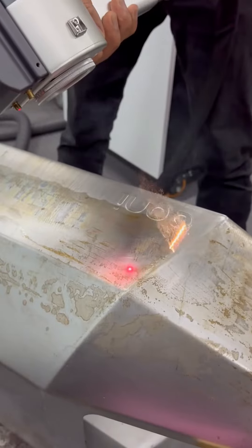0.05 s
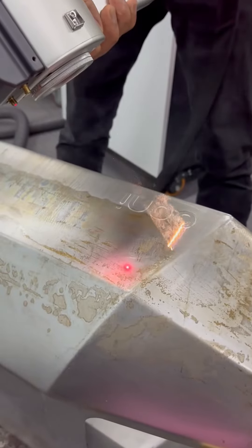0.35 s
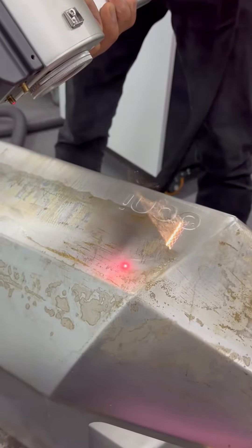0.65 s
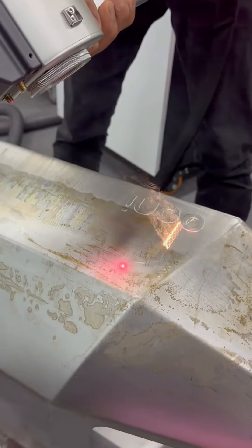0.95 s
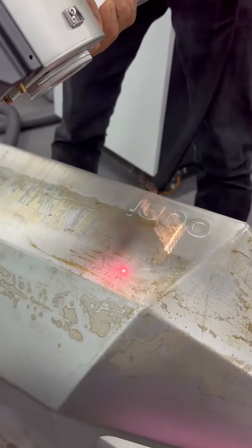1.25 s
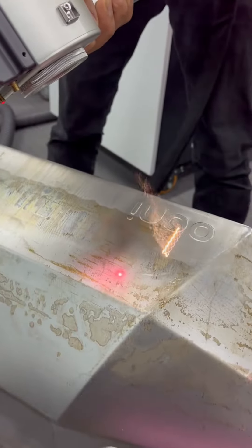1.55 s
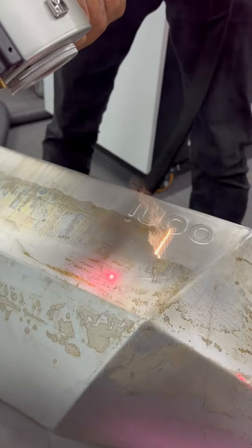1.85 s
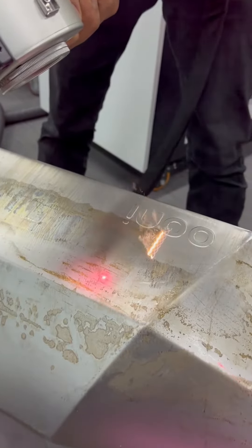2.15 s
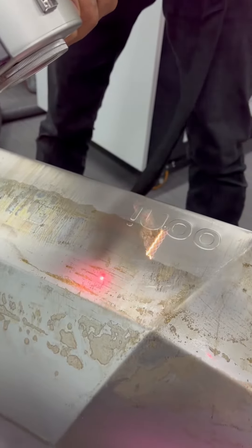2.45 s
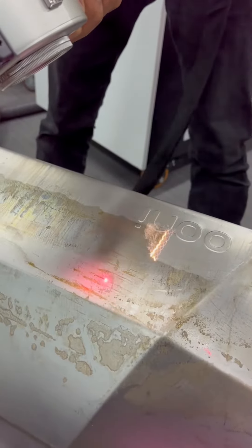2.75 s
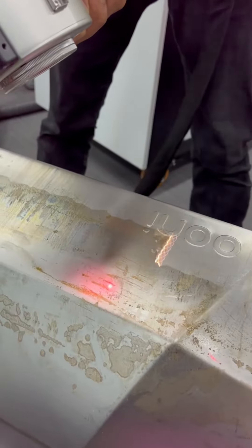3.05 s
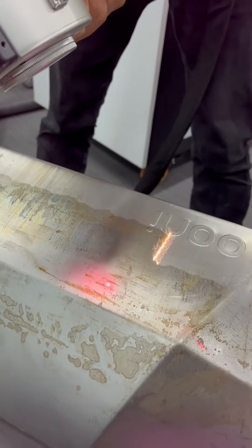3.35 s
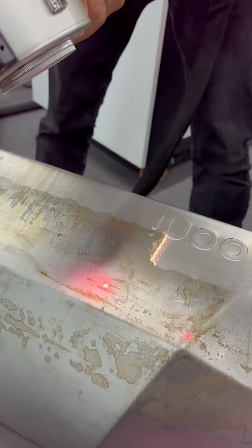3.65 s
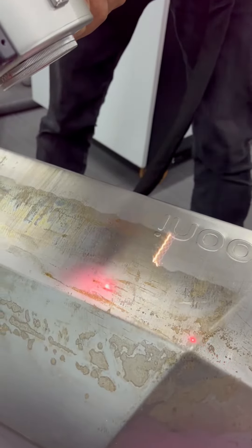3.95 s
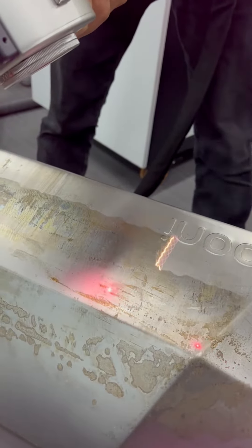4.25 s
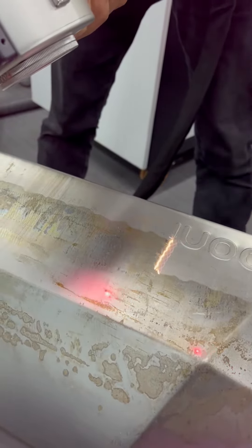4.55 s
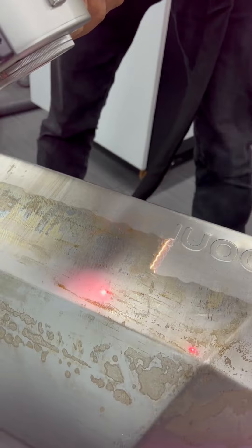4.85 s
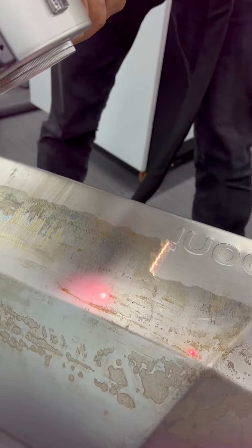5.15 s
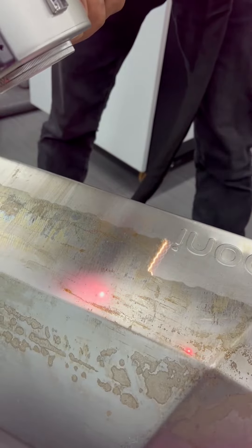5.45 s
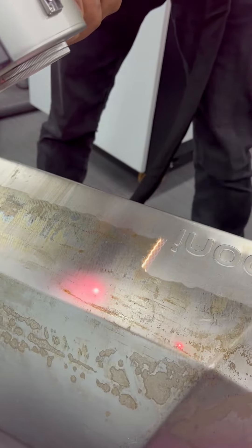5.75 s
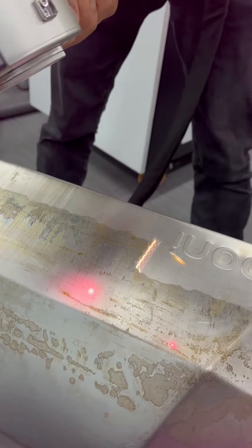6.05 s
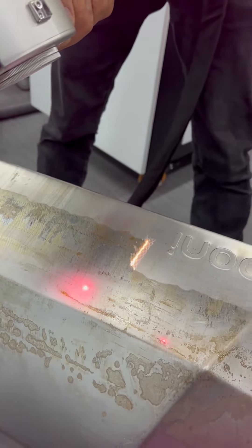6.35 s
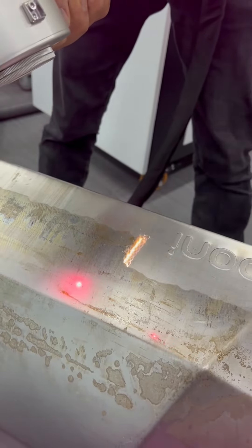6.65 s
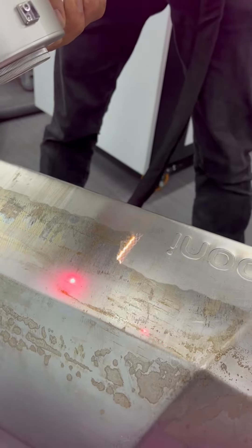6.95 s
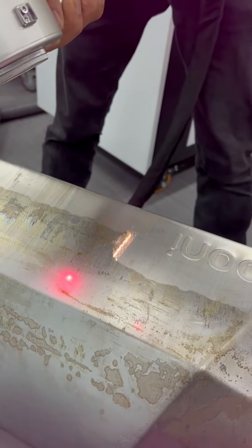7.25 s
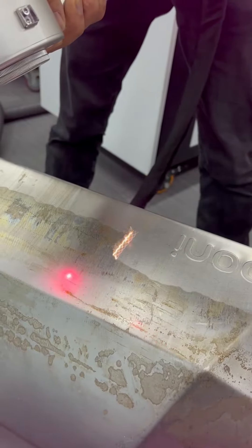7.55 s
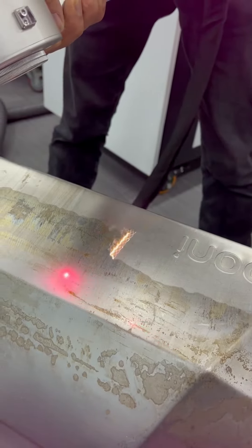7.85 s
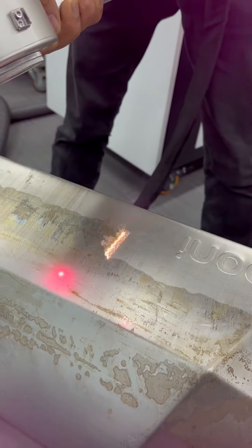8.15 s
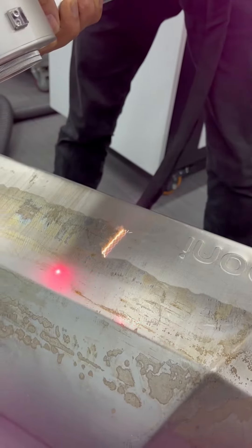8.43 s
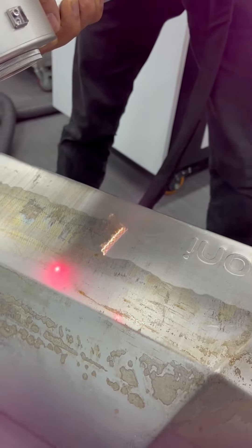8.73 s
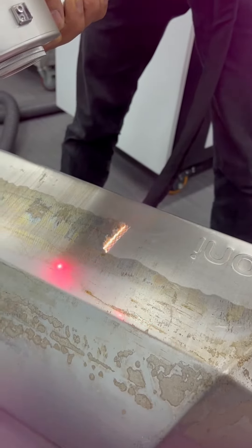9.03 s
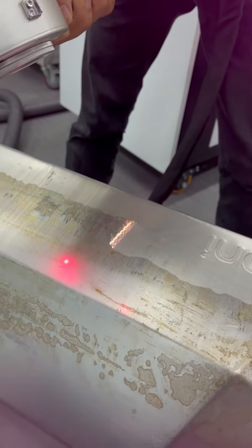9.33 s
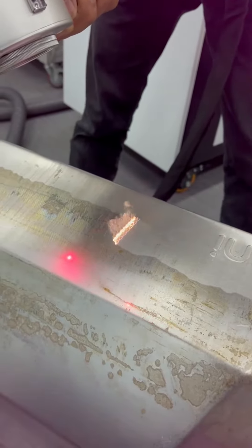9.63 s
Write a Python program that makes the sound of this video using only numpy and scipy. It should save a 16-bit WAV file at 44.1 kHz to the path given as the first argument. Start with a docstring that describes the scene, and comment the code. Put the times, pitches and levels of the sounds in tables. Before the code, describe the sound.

A close, sizzling electric buzz with sharp pops from a laser cleaning oily metal, over a steady workshop machine hum.

```python
"""A handheld laser cleaner burns oil film off a metal block, close to a phone in a workshop.
The beam retraces one figure 49 times a second and spits at the same oily spots on every round:
a crackling buzz that surges with the oil it meets and twice catches flame. Thick specks pop, smoke
roars softly and the mirror that steers the beam whines. Fans, a pump and a chiller hum behind it."""
import sys
import numpy as np
from scipy import signal
from scipy.fft import rfft, irfft, next_fast_len
from scipy.io import wavfile
from scipy.ndimage import map_coordinates

SR = 44100
rng = np.random.default_rng(int(sys.argv[2]) if len(sys.argv) > 2 else 0)


def waveform_to_disk(signal):
    """Save audio, clipped to [-1, 1], as 16-bit WAV at the path in sys.argv[1]."""
    frames = np.transpose(np.atleast_2d(signal))
    scaled = np.clip(frames, -1, 1) * 32767
    samples = np.round(scaled).astype(np.int16)
    wavfile.write(sys.argv[1], SR, samples)


N = 431738
T = np.arange(N) / SR
SCAN_HZ = 48.906  # rounds of the beam per second
USUAL_BURN_DB = -30  # burn level of an average film
# thick specks that burst in a single pass: (time [s], level [dB])
SPECKS = [(.1741, -16.5), (0.448, -17.5), (0.4686, -20), (.558, -17), (0.57, -20), (.5808, -17),
          (.7217, -15), (.7346, -22), (.7439, -18), (0.985, -15), (1.0079, -17), (1.028, -22),
          (1.1113, -17), (1.1208, -18), (1.1316, -17), (1.1522, -23), (1.275, -20), (1.3958, -17),
          (1.4785, -15.5), (1.4982, -13), (1.6021, -16), (1.6233, -15.5), (1.644, -18), (1.6633, -17),
          (1.6825, -14), (1.7648, -18), (1.867, -15.5), (1.9293, -18), (2.356, -21), (3.3595, -16),
          (6.3657, -14.5), (6.4062, -16.5), (6.4263, -18), (6.4465, -21), (6.4671, -15), (6.4875, -16),
          (6.5082, -14), (6.5286, -14.5), (6.5488, -18), (6.5577, -16), (6.5694, -17), (6.5897, -13),
          (6.611, -21), (6.7207, -16), (7.1217, -14), (7.142, -13.5), (7.203, -17.5), (7.224, -20),
          (7.4093, -14), (7.4306, -14.5), (7.5487, -16), (7.5692, -19), (7.9319, -18.5), (7.9523, -19),
          (7.972, -15.5), (8.0021, -19), (8.0746, -19), (8.0956, -18), (8.1154, -18), (8.1771, -20),
          (8.2474, -17), (8.5728, -14.5), (8.684, -15), (8.7047, -17), (8.8684, -18), (9.1466, -14.5),
          (9.6163, -20), (9.6339, -12), (9.641, -18), (9.6616, -22)]


def undb(db):
    """Turn decibels into a gain."""
    return 10 ** (np.asarray(db) / 20)


def curve(table, at):
    """Join (x, value) rows with straight lines."""
    return np.interp(at, *np.transpose(table))


def walk(rate, at=T):
    """A random drift of size about 1 that takes `rate` turns a second."""
    knots = rng.standard_normal(1024)
    return np.interp(at * rate, np.arange(len(knots)), knots)


def spectrum(points, hz):
    """Gain at each frequency, from (Hz, dB) points joined on a log axis."""
    f, db = np.transpose(points)
    return undb(np.interp(np.log(hz + 1), np.log(f), db))


def convolve(x, response):
    """Pass sound through a short response, such as an echo."""
    return signal.oaconvolve(x, response)[:N]


def colour(x, points, size=4096):
    """Shape the tone with a filter that never rings ahead of a pop, so pops stay sharp."""
    cepstrum = irfft(np.log(spectrum(points, np.fft.rfftfreq(size, 1 / SR))))
    cepstrum[1:size // 2] *= 2
    cepstrum[size // 2 + 1:] = 0
    return convolve(x, irfft(np.exp(rfft(cepstrum))))


def cut(x, hz, kind, order=2):
    """Keep what lies below ("low") or above ("high") a frequency."""
    return signal.sosfilt(signal.butter(order, hz, kind, fs=SR, output="sos"), x)


def flash_train(times, sizes, width_s, front_share=.22):
    """Loudness outline of short flashes, each with a quick rise and a slower fall."""
    index = (times[:, None] * SR).astype(int) + np.arange(-180, 260)
    since = index / SR - times[:, None] + width_s / 2
    slope = 2 * width_s * np.where(since < 0, front_share, 1 - front_share)
    bells = sizes[:, None] * np.exp(-(since / (2 * slope)) ** 2)
    inside = (index >= 0) & (index < N)
    return np.bincount(index[inside], bells[inside], N)


def snap_train(times, sizes):
    """Sharp clicks at exact times, even between samples."""
    index = (times[:, None] * SR).astype(int) + np.arange(-7, 9)
    since = index - times[:, None] * SR
    clicks = sizes[:, None] * np.sinc(since) * np.sinc(since / 8)
    inside = (index >= 0) & (index < N)
    return np.bincount(index[inside], clicks[inside], N)


def workshop(x, room_db=-11, fade_s=0.079):
    """The room's short echo, which falls 60 dB in fade_s."""
    t = T[:SR // 2]
    tail = rng.standard_normal(len(t)) * undb(-60 * t / fade_s) * (t > .002)
    return convolve(x, undb(room_db) * tail / np.linalg.norm(tail))


def microphones(direct, diffuse, apart_hz=900):
    """The phone's two microphones differ in timing and level; room sound is alike only in the bass."""
    # how far the left one is ahead: (frequency [Hz], phase [rad])
    lead = [(100, 0), (300, -.25), (500, -.9), (800, -.9), (1150, -.6), (1350, -.35), (1800, 0), (2300, .9),
            (2650, 2.1), (3200, 2.1), (3700, 1.4), (4200, 1.1), (4500, 1.7), (4900, .7), (5800, 3.14),
            (16000, 17.5)]
    # how much louder the left one is: (frequency [Hz], gain [dB])
    balance = [(400, 0), (740, .5), (860, -2), (1030, -.3), (1200, -2), (1550, 0), (1850, 0), (2450, -5.5),
               (2900, -7.5), (3400, -3), (4400, -4.5), (5400, 0)]
    padded = next_fast_len(N)
    hz = np.fft.rfftfreq(padded, 1 / SR)
    sides = np.array([[1], [-1]])
    common, apart = rfft(diffuse, padded)
    unlike = .5 / (1 + (apart_hz / (hz + 1)) ** 2)
    room = np.sqrt(1 - unlike) * common + sides * np.sqrt(unlike) * apart
    facing = np.sqrt(spectrum(balance, hz)) ** sides * np.exp(.5j * sides * curve(lead, hz))
    return irfft((rfft(direct, padded) + room) * facing, padded)[:, :N]


def fans(flutter_db=1.5):
    """Swirling air rushes from the cooling fans."""
    # tone of the rush: (frequency [Hz], level [dB])
    tone = [(20, -100), (32, -72), (46, -59.5), (70, -62), (125, -57.5), (190, -56.5), (245, -53.5),
            (330, -60), (480, -60), (900, -66), (2000, -80.5), (4500, -86), (7000, -104), (16000, -85)]
    return colour(rng.standard_normal(N) * np.sqrt(SR / 2), tone) * undb(flutter_db * walk(9))


def hum(harmonics, hz, wander=0.0036, waver_db=1.4, in_step_s=5.5):
    """One machine's tones, on multiples of hz; they waver a little with its load."""
    tones = sum(undb(db) * np.cos(2 * np.pi * k * hz * (T - in_step_s) + wander * k * hz * walk(3))
                for k, db in harmonics)
    return np.sqrt(2) * tones * undb(waver_db * walk(9.6))


def machines():
    """Chiller, mains power, fan blades and pump hum; pump and mains throb together 3 times a second."""
    # tones of each hum: (multiple, level [dB])
    chiller_tones = [(1, -32), (2, -46), (3, -53)]
    mains_tones = [(2, -37.5), (4, -46), (6, -49), (8, -47)]
    blade_tones = [(2, -44), (3, -51)]
    pump_tones = [(2, -34.5), (3, -42), (4, -47), (5, -47), (6, -47), (7, -51), (9, -51), (11, -51),
                  (14, -53), (17, -55), (18, -53), (19, -58)]
    # how two of the hums swell and sink: (time [s], gain [dB])
    chiller_swell = [(0, 0), (.8, -2), (1.6, 1.5), (2.6, -0.5), (3.4, -1), (4.4, -0.5), (5.6, -1.5),
                     (6.3, -2), (7, 0), (7.6, -1.5), (8.4, -2.5), (9.3, 1.5), (9.8, -1)]
    pump_swell = [(0, 5.5), (.8, -26), (1.5, -11), (2.7, -9), (4.3, 0.5), (5.5, -2), (6.5, -0.5), (7.6, 1),
                  (8.3, -2), (8.7, -2), (9.2, 0.5), (9.8, -10)]
    chiller = undb(curve(chiller_swell, T)) * hum(chiller_tones, hz=48.1, waver_db=1.5)
    mains = hum(mains_tones, hz=50)
    blades = hum(blade_tones, hz=92.35)
    pump = undb(curve(pump_swell, T)) * hum(pump_tones, hz=48.5)
    return chiller + mains + blades + pump


def scan_tones(table, waver_db=2.5):
    """Drifting, fluttering tones on multiples of the scan rate."""
    return sum(undb(db + waver_db * walk(12)) * np.sin(2 * np.pi * k * SCAN_HZ * T + walk(2))
               for k, db in table)


def mirror(whine_hz=82 * SCAN_HZ):
    """The scanning mirror whines thinly among fainter tones, over the hum of its drive."""
    # loudness of the whine and of the hum: (time [s], level [dB])
    whine_level = [(0, -56.5), (2, -54.5), (3.4, -52.5), (4.5, -52), (6, -53), (6.6, -51.5), (7.7, -52),
                   (8.2, -49.5), (8.8, -48.5), (9.1, -45), (9.6, -43), (9.8, -43.5)]
    drive_level = [(0, 0.5), (6, -5), (6.5, 5.5), (7.2, -4), (8.4, -.5), (9.7, 0)]
    # faint high tones and the drive's low ones: (multiple of the scan rate, level [dB])
    overtones = [(27, -54), (28, -54), (41, -57), (46, -55), (47, -58), (56, -58), (58, -56.5), (60, -57),
                 (73, -60), (90, -61), (96, -57), (97, -56)]
    drive_tones = [(7, -51), (8, -49), (9, -48), (11, -51), (15, -50), (17, -51), (19, -51)]
    whine = undb(curve(whine_level, T) + 1.5 * walk(9))
    whine *= np.sin(2 * np.pi * whine_hz * T + .18 * walk(40))
    faint = scan_tones(overtones)
    drive = undb(curve(drive_level, T)) * scan_tones(drive_tones)
    return np.sqrt(2) * (whine + faint + drive)


def smoke():
    """Smoke rises with a soft, low roar, mostly near the start and the end."""
    # loudness of the roar: (time [s], level [dB])
    level = [(0, -38.5), (1, -39.5), (1.9, -39), (2.8, -60), (8.9, -56), (9.6, -35), (9.8, -34)]
    # its tone: (frequency [Hz], level [dB])
    tone = [(20, -29), (110, -20.5), (175, 0.5), (215, -3.5), (300, -14.5), (1000, -38), (16000, -80)]
    roar = colour(rng.standard_normal(N), tone)
    return undb(curve(level, T)) * roar / roar.std()


def flames(width_ms=1.65):
    """Burning vapour thumps and rasps twice a round, where the oil lies thickest."""
    # the vapour catches flame: (time [s], half length [s], level [dB])
    flares = [(6.483, 0.1, -27), (6.533, 0.02, -22.5), (7.12, 0.0096, -33)]
    # the two thumps: (time into the round [ms], level [dB])
    thumps = [(6.9, -3), (17.3, -7.5)]
    # tone of the rasp: (frequency [Hz], level [dB])
    tone = [(60, -6), (150, -4), (320, 2), (480, 5), (700, -8), (2000, -21)]
    round_ms = (T * SCAN_HZ % 1) / SCAN_HZ * 1000
    thump = sum(undb(db) * np.exp(-.5 * ((round_ms - at) / width_ms) ** 2) for at, db in thumps)
    swell = sum(undb(db) * np.exp(-np.minimum(.5 * ((T - at) / length) ** 2, 20))
                for at, length, db in flares) / thump.std()
    rasp = colour(swell * thump * rng.standard_normal(N), tone)
    return swell * (thump.mean() - thump) + rasp


def puffs(flashes, level_db=0.5, limit=0.29):
    """Each flash or speck throws a puff of vapour; the film holds only so much, so big ones level off."""
    # tone of a puff: (frequency [Hz], level [dB])
    tone = [(40, -21), (100, -5), (200, -5), (440, -3.5), (680, -6.5), (900, -0.5), (1150, 0.5),
            (1400, 2.5), (2200, 1.5), (6000, -39)]
    # how strong the puffs are: (time [s], gain [dB])
    strength = [(0, -3.5), (1, -5.5), (1.8, -5), (2.6, 1.5), (3.7, 1.5), (5.7, 3.5), (6.25, -4.5),
                (6.5, -5), (6.8, -3), (7.3, 2), (8.1, 3), (8.7, 1.5), (9.8, 4)]
    times, db = np.transpose(SPECKS)
    speck_flashes = flash_train(times, undb(db), width_s=.00035)
    vapour = limit * np.tanh(np.maximum(flashes, speck_flashes) / limit)
    return -undb(level_db + curve(strength, T)) * colour(vapour, tone)


def specks(boost_db=15.3, fragments=5, fragment_db=-7, within_s=.0024):
    """Each thick speck bursts with one hard snap, and its fragments follow at uneven moments."""
    # a bigger speck sheds more: (speck level [dB], fragment gain [dB])
    shedding = [(-18.5, -2), (-17, 1.5), (-13, 3.5)]
    times, db = np.transpose(SPECKS)
    lag, weight = rng.uniform(.1, 1, (len(times), 2, fragments)).transpose(1, 2, 0)
    size = undb(db + boost_db)
    shed = size * undb(fragment_db + curve(shedding, db)) * np.sqrt(weight)
    return snap_train(times, size) + snap_train((times + within_s * lag).ravel(), shed.ravel())


def burning():
    """How fiercely the oil burns, in dB: a slow rise and fall with short spurts on top."""
    # the hand moves over thicker and thinner oil: (time [s], level [dB])
    steady = [(0.0, -39), (0.55, -39), (1.1, -34.5), (1.35, -38.5), (1.58, -44), (2.15, -32), (2.5, -35),
              (3.07, -41.5), (3.4, -33.5), (3.65, -39.5), (4.2, -40.5), (4.55, -32), (5.0, -40.5),
              (5.55, -35), (6.15, -34.5), (6.55, -27), (6.75, -29), (6.95, -35.5), (7.35, -34.5),
              (7.75, -33), (8.05, -32), (8.45, -35.5), (8.8, -39), (9.08, -37), (9.5, -33), (9.65, -27),
              (9.79, -32)]
    # the trembling hand pushes the beam into fresh oil: (time [s], half length [s], level [dB])
    spurts = [(0.078, 0.022, -33), (0.21, 0.029, -32), (0.33, 0.029, -31.5), (0.472, 0.052, -30.5),
              (0.593, 0.031, -27), (0.75, 0.076, -28.5), (0.91, 0.041, -28.5), (1.02, 0.026, -27),
              (1.131, 0.029, -26.5), (1.27, 0.021, -34), (1.397, 0.03, -33.5), (1.535, 0.057, -30.5),
              (1.656, 0.053, -28), (1.763, 0.028, -30), (1.903, 0.052, -30), (2.063, 0.032, -33),
              (2.261, 0.03, -34.5), (2.356, 0.028, -31), (2.584, 0.017, -35.5), (2.73, 0.041, -33),
              (2.868, 0.049, -31.5), (3.01, 0.029, -31.5), (3.129, 0.024, -31.5), (3.268, 0.058, -31.5),
              (3.37, 0.019, -33.5), (3.549, 0.034, -33.5), (3.826, 0.021, -37), (4.017, 0.084, -36.5),
              (4.38, 0.018, -35), (4.959, 0.016, -36), (5.097, 0.024, -34.5), (5.207, 0.018, -35.5),
              (5.354, 0.018, -38.5), (5.734, 0.022, -36.5), (6.24, 0.021, -35), (6.998, 0.024, -32.5),
              (7.121, 0.037, -29), (7.245, 0.039, -31.5), (7.416, 0.041, -30), (7.538, 0.037, -31.5),
              (7.957, 0.043, -30.5), (8.147, 0.089, -29), (8.34, 0.019, -35), (8.61, 0.037, -34.5),
              (8.724, 0.041, -32), (8.849, 0.026, -30.5), (8.969, 0.034, -33.5), (9.172, 0.085, -34),
              (9.332, 0.021, -29.5), (9.625, 0.05, -33)]
    power = undb(curve(steady, T)) ** 2
    for at, length, db in spurts:
        near = slice(max(int((at - 4 * length) * SR), 0), int((at + 4 * length) * SR))
        power[near] += undb(db) ** 2 * np.exp(-((T[near] - at) / length) ** 2)
    return 10 * np.log10(power)


def streak_db(spot_ms, at):
    """A spot gets louder while a streak of thick oil lies under it."""
    # oil streaks: (start [s], end [s], time into the round [ms], gain [dB])
    streaks = [(0, .3, 10.5, 7), (.3, 2.5, 18.9, 3), (.5, 2.6, 7.1, 4), (6.33, 6.6, 5.9, 9),
               (6.33, 6.6, 7.9, 6), (7.05, 7.16, 18.9, 7), (7.5, 7.72, 3.5, 8), (7.7, 8.3, 18.9, 6),
               (8.3, 8.45, .8, 8)]
    return sum(db * ((at >= start) & (at < end))
               for start, end, ms, db in streaks if abs(ms - spot_ms) < .5)


def film(memory_s=.35):
    """Fine grain of the oil film: nearly the same on each round, renewed as the hand moves on."""
    round_samples = round(SR / SCAN_HZ)
    kept = np.exp(-1 / (memory_s * SCAN_HZ))
    fresh = rng.standard_normal((int(T[-1] * SCAN_HZ) + 2, round_samples))
    fresh[1:] *= np.sqrt(1 - kept ** 2)
    grain = signal.lfilter([1], [1, -kept], fresh, axis=0).ravel()
    return map_coordinates(grain, [T * SCAN_HZ * round_samples], order=3)


def ringing(spits, wander_db=1.5):
    """The metal rings faintly; each note swells and sinks as the beam moves over the block."""
    # the metal's notes: (frequency [Hz], time to fall 60 dB [s], relative level [dB])
    notes = [(7900, .007, -22), (4850, .011, -20), (4050, .02, -26), (2860, .014, -19), (2270, .02, -29),
             (2020, .02, -29)]
    t = T[:SR // 8]
    rings = (undb(db) * np.cos(2 * np.pi * hz * t) * undb(-60 * t / fade) / 10 for hz, fade, db in notes)
    return sum(convolve(spits, ring) * undb(wander_db * walk(1.93)) for ring in rings)


def scattered(flashes, burn_db, level_db=-6.5, above_hz=2200):
    """High sounds glance off the block's faces: the same spits arrive with another grain."""
    return undb(level_db) * cut(crackle(flashes, burn_db), above_hz, "high", order=4)


def crackle(flashes, burn_db, snaps=0, repeat_share=0.57, blur_hz=9000):
    """Each flash spits; the coarse grain partly repeats each round, the finest is always new."""
    # even sizzle, a bigger part in thin film: (burn above usual [dB], gain [dB])
    sizzle_gain = [(-9, -2.5), (-3, -5), (2, -7)]
    # tone of the crackle: (frequency [Hz], level [dB])
    tone = [(200, -6.5), (800, 2.5), (1120, 3.5), (1380, 5), (1700, 0.5), (2400, 0), (2850, -1),
            (3400, -0.8), (4400, -2), (4750, 0), (5050, -2.4), (5600, -2.5), (6000, -8.5), (6700, -2.5),
            (8300, -1.8), (9300, -2), (10400, -8), (12500, -4.5), (16000, -15.5)]
    grain = cut(film(), blur_hz, "low") + cut(rng.standard_normal(N), blur_hz, "high")
    grain = np.sqrt(repeat_share) * grain + np.sqrt(1 - repeat_share) * rng.standard_normal(N)
    sizzle = undb(burn_db + curve(sizzle_gain, burn_db - USUAL_BURN_DB))
    spits = colour(grain * (flashes + sizzle) + snaps, tone)
    return spits + ringing(spits)


def beam(burn_db, spots_db=3, patchy_db=0.5, drift_ms=.05, jitter_ms=.012):
    """Each time the beam crosses an oily spot, it makes a short flash of burning and a sharp snap."""
    # oily spots: (time into the round [ms], half width [ms], relative level [dB], gain per burn [dB/dB])
    spots = [(.82, 0.56, -12.5, -0.5), (3.52, 0.3, -9, -0.05), (5.87, 0.29, -8, -0.4),
             (7.12, 0.12, -10.5, 0.5), (7.95, 0.29, -8, 0.2), (10.47, 0.27, -11, 0),
             (14.56, 0.37, -9.5, -0.1), (16.55, 0.26, -13, 0.2), (18.95, 0.36, -9, -0.44)]
    # how much of a spit is snap: (burn above usual [dB], share of energy [0-1])
    snap_share = [(-9, .12), (-3, .36), (2, .58)]
    rounds = np.arange(int(T[-1] * SCAN_HZ) + 1) / SCAN_HZ
    fiercer_db = np.interp(rounds, T, burn_db) - USUAL_BURN_DB
    # the spots share the oil unevenly, and the shares shift as the hand moves on
    shares = np.array([undb(db + growth * fiercer_db + streak_db(ms, rounds) + patchy_db * walk(6, rounds))
                       for ms, _, db, growth in spots])
    shares /= np.linalg.norm(shares, axis=0)
    shares *= undb(.35 * np.minimum(fiercer_db, 0))  # thin film spits less
    uneven_db = np.maximum(2.2 + .25 * fiercer_db, 1)  # fierce burning spits less evenly
    sharp = curve(snap_share, fiercer_db)
    flashes = snaps = 0
    for (ms, width_ms, _, _), share in zip(spots, shares):
        when = rounds + (ms + drift_ms * walk(3, rounds) + jitter_ms * rng.standard_normal(len(rounds))) / 1000
        luck_db = uneven_db * rng.standard_normal(len(rounds))
        size = share * undb(spots_db + np.interp(when, T, burn_db) + luck_db)
        width_s = width_ms / 1000
        height = size * np.sqrt((1 - sharp) / (width_s * SCAN_HZ * np.sqrt(2 * np.pi)))
        flashes += flash_train(when, height, width_s)
        no_speck = np.abs(when[:, None] - np.array(SPECKS)[:, 0]).min(axis=1) > .001
        snaps += snap_train(when, no_speck * size * np.sqrt(sharp * SR / SCAN_HZ))
    return flashes, snaps


def scene(crackle_db=-2.0, fan_db=-3, snap_above_hz=900):
    """The laser buzzes in front, the machines hum behind."""
    burn_db = burning()
    flashes, snaps = beam(burn_db)
    snaps = cut(snaps + specks(), snap_above_hz, "high")
    laser = undb(crackle_db) * crackle(flashes, burn_db, snaps) + puffs(flashes)
    hums = machines()
    diffuse = [workshop(laser) + undb(crackle_db) * scattered(flashes, burn_db) + undb(fan_db) * fans()
               for _ in range(2)]
    direct = laser + flames() + smoke() + mirror() + hums + undb(fan_db) * fans()
    return microphones(direct, np.array(diffuse))


def record(dry, top_hz=15950):
    """The phone cuts the deepest rumble and the highest treble."""
    dry = cut(dry, 26, "high", order=4)
    return signal.sosfilt(signal.ellip(10, .2, 80, top_hz, fs=SR, output="sos"), dry)


dry = scene()
out = record(dry)
waveform_to_disk(out)
```